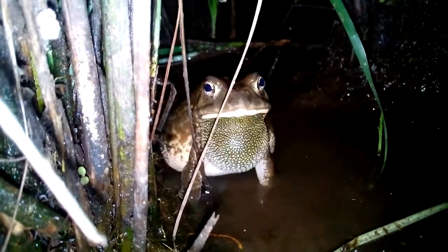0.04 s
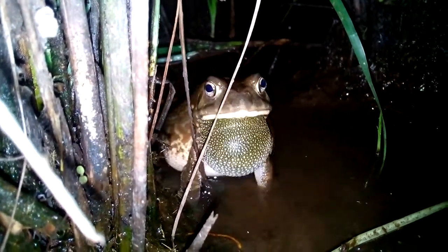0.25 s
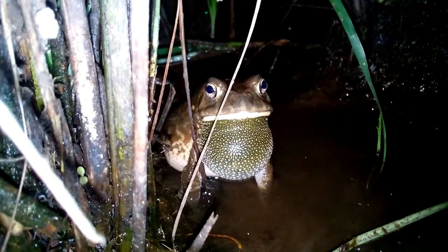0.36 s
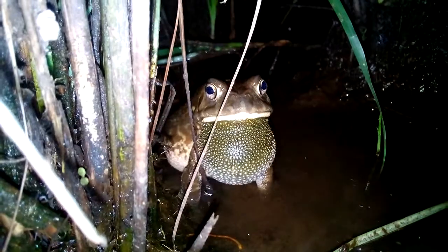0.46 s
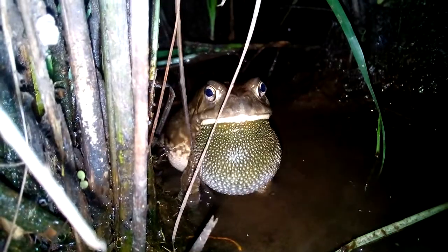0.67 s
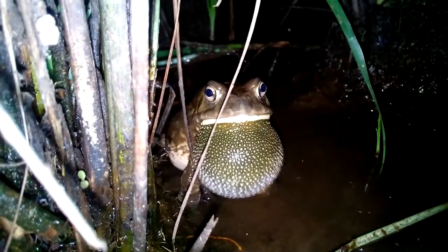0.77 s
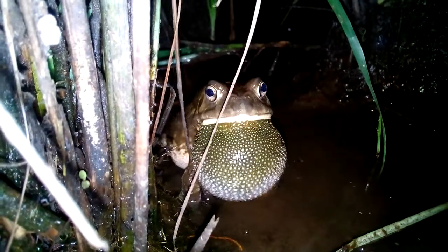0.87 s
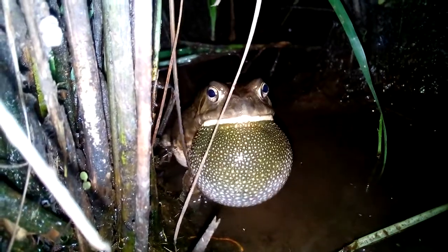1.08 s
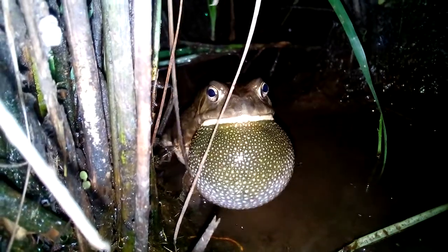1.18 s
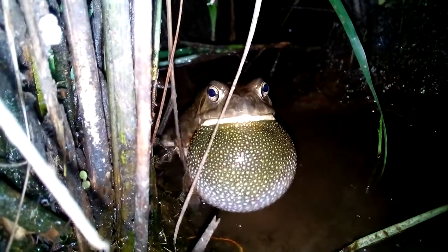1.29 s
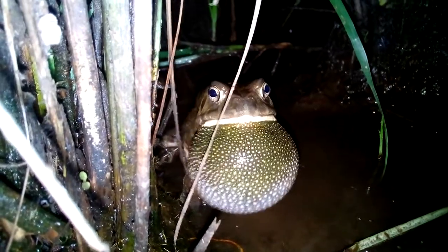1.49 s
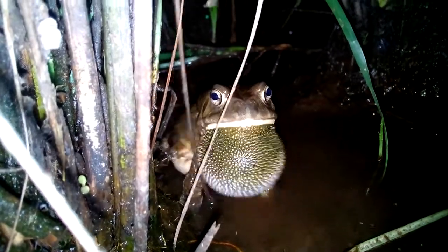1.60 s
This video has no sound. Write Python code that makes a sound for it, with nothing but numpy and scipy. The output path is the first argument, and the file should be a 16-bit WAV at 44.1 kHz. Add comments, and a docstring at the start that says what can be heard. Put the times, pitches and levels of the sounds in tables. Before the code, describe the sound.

Close frog croaking in quickening hollow pulses over a night chorus of chirps and trills.

```python
"""Night at shallow water: a far chorus blurs into a wash and a toad trills without pause.
A small frog starts chirping eight times a second, echoing off the reeds; a far frog whoops twice.
From 0.26 s, between the whoops, a near frog gives one accelerating trill of hollow knocks: puffs of
air ring its filling sac and throat. A few knocks carry a tick; the water rumbles softly beneath.
The main ring rises in pitch, then fades and leaves a dull clack."""
import sys
import numpy as np
from scipy import signal
from scipy.fft import rfft, irfft
from scipy.io import wavfile
from scipy.ndimage import uniform_filter1d, minimum_filter1d

SR = 44100
rng = np.random.default_rng(int(sys.argv[2]) if len(sys.argv) > 2 else 0)


def dump_mix(stems):
    """Bounce the given channels to the path in sys.argv[1] as a 16-bit WAV at rate SR."""
    frames = np.atleast_2d(stems).T  # one column per channel
    limited = np.clip(frames, -1, 1)  # hard clip at full scale
    pcm = np.round(limited * 32767).astype(np.int16)
    wavfile.write(sys.argv[1], SR, pcm)


N = 72765


def from_db(db):
    """Decibels to gain."""
    return 10 ** (np.asarray(db) / 20)


def at_time(rows, time_s):
    """Columns of a curve, interpolated at time_s."""
    times, *columns = np.transpose(rows)
    return [np.interp(time_s, times, column) for column in columns]


def add_ring(out, onset_s, hz, db, attack_s, t60_s):
    """Add one resonance: quick swell around onset_s, exponential decay."""
    span = np.arange(max(0, int((onset_s - .01) * SR)), min(N, int((onset_s + .08) * SR)))
    t = span / SR - onset_s
    swell = .5 + .5 * np.tanh(t / attack_s / 2)
    decay_db = 60 * np.logaddexp(0, t / attack_s) * attack_s / t60_s
    out[span] += from_db(db - decay_db) * swell * np.cos(2 * np.pi * hz * t)


# Chorus and air spectrum: freq_hz, relative_db
NIGHT_SPECTRUM = [(30, -35.5), (200, -41), (300, -29), (430, -3), (600, -9.5), (900, -7), (1400, -2.5),
                  (1800, -5.5), (2300, -19), (3400, -24.5), (4300, -36), (5200, -34), (6200, -42),
                  (7500, -54), (16000, -58)]
# Wash drift: time_s, relative_db
NIGHT_DRIFT = [(0, 0.5), (.3, 0.5), (.9, -1), (1.25, 0.5), (1.34, -4), (1.46, -2.5), (1.65, 2)]


def night(level_db=-42.5):
    """Far chorus and night air, blurred into a noise wash."""
    hz, db = np.transpose(NIGHT_SPECTRUM)
    bin_hz = np.arange(N // 2 + 1) * SR / N
    colour = from_db(np.interp(np.log(bin_hz + 1), np.log(hz), db))
    wash = irfft(rfft(rng.standard_normal(N)) * colour, N)
    drift_db, = at_time(NIGHT_DRIFT, np.arange(N) / SR)
    return from_db(level_db + drift_db) * wash / wash.std()


# Trill envelope: time_s, level_db
TOAD_ENVELOPE = [(0, -37), (.2, -28), (.5, -35), (.8, -29), (1.0, -31), (1.2, -28.5), (1.33, -41),
                 (1.45, -35.5), (1.65, -31)]
# Toad resonances: pitch_hz, gain_db, attack_s, t60_s
TOAD_RESONANCES = [(1294, -3.5, 0.0002, 0.013), (1520, 4.5, .0006, 0.0083), (1780, -5.5, 0.00076, 0.0046)]


def toad(start_rate_hz=137.4, slowing_hz_per_s=1.8, jitter_s=.00013, uneven_db=1.2):
    """Far toad: a fast, slightly slowing train of uneven pulses rings fixed resonances."""
    out = np.zeros(N)
    rate_hz = start_rate_hz - slowing_hz_per_s * np.arange(N) / SR
    cycles = np.cumsum(rate_hz) / SR + .5
    starts_s = np.flatnonzero(np.diff(np.floor(cycles))) / SR
    for start_s in starts_s:
        late_s = rng.normal(0, jitter_s)
        pulse_db = at_time(TOAD_ENVELOPE, start_s)[0] + rng.normal(0, uneven_db)
        for hz, mode_db, attack_s, t60_s in TOAD_RESONANCES:
            add_ring(out, start_s + late_s, hz, pulse_db + mode_db, attack_s, t60_s)
    return out


# Chirp pulses: start_s, relative_db
CHIRP_PULSES = [(.0895, -25.5), (0.1074, -28.5), (.1145, -33), (0.2062, -28.5), (.228, -27), (0.3226, -27),
                (0.3415, -28), (0.4413, -31), (0.4618, -28.5), (.562, -31.5), (0.581, -30), (.593, -35),
                (0.681, -31), (.703, -37), (0.799, -30.5), (.821, -38), (0.8326, -38), (0.921, -37),
                (0.9389, -34), (0.9518, -40), (1.0424, -32.5), (1.0605, -33.5), (1.0751, -36.5),
                (1.165, -31), (1.1826, -33), (1.1955, -35.5), (1.2885, -32), (1.306, -37), (1.319, -38.5),
                (1.4072, -29), (1.425, -30), (1.441, -33), (1.5268, -29), (1.548, -28), (1.5602, -31.5)]
# Small frog resonances: pitch_hz, gain_db, attack_s, t60_s
CHIRP_RESONANCES = [(3338, 3.5, 0.00083, 0.017), (3725, -6.5, 0.00054, .016)]


def small_frog(gain_db=5.5):
    """Chirps of two or three pulses, each ringing two high resonances."""
    out = np.zeros(N)
    for start_s, pulse_db in CHIRP_PULSES:
        for hz, mode_db, attack_s, t60_s in CHIRP_RESONANCES:
            detune = 1 + rng.normal(0, .004)
            add_ring(out, start_s, hz * detune, pulse_db + mode_db + gain_db, attack_s, t60_s)
    return out


def reed_echo(calls, gain_db=-13.5, t60_s=.14, delay_s=.004):
    """Short, faint scatter off stems and bank."""
    t = np.arange(SR // 3) / SR
    tail = rng.standard_normal(len(t)) * from_db(-60 * t / t60_s) * (t > delay_s)
    return from_db(gain_db) * signal.fftconvolve(calls, tail / np.linalg.norm(tail))[:N]


# Whoops: start_s, length_s, from_hz, to_hz, level_db
WHOOP_SWEEPS = [(0.173, 0.084, 850, 1703, -27.5), (0.56, .075, 1094, 1950, -30)]


def far_frog(bend_power=2.1, swell_power=3):
    """Whoops: pure notes that swell as they sweep up ever faster."""
    out = np.zeros(N)
    for start_s, length_s, from_hz, to_hz, level_db in WHOOP_SWEEPS:
        progress = np.clip((np.arange(N) / SR - start_s) / length_s, 0, 1)
        hz = from_hz + (to_hz - from_hz) * progress ** bend_power
        swell = np.sin(np.pi * progress ** swell_power)
        out += from_db(level_db) * swell * np.sin(2 * np.pi * np.cumsum(hz) / SR)
    return out


# Air puffs, one per knock: start_s, main_relative_db, throat_relative_db, low_db
PUFFS = [(0.2629, -9, -4, -26.5), (0.3493, -5.5, -0.5, -28.5), (0.4201, -4.5, -3.5, -31),
         (0.4811, -4.5, -0.5, -31.5), (0.5389, -6, -2, -32), (0.5955, -7, -2, -33),
         (0.6483, -5.5, -0.5, -25), (0.705, -7.5, -2, -22.5), (0.7603, -8.5, -3.5, -29),
         (0.8155, -7.5, -2, -25.5), (.8690, -5, 0.5, -22.5), (0.9187, -7.5, -2, -27.5),
         (0.9629, -7, 2.5, -21), (1.0010, -7.5, 0.5, -18.5), (1.045, -8.5, 1.5, -20), (1.0867, -8, 2, -12),
         (1.1296, -8, 1.5, -21.5), (1.1719, -10.5, 0.5, -20), (1.2138, -10, 2.5, -16.5),
         (1.2507, -11.5, 1.5, -18.5), (1.284, -12.5, 2, -12), (1.3172, -18, -0.5, -14.5),
         (1.3509, -19, -11, -23), (1.3981, -15, -9, -20), (1.4343, -15.5, -7, -20.5)]
# Main sac ring: time_s, pitch_hz, t60_s
SAC_MAIN_RING = [(.26, 1075, 0.023), (.42, 1113, 0.016), (.6, 1181, 0.025), (.76, 1205, .031),
                 (.9, 1214, 0.023), (1.09, 1231, 0.023), (1.25, 1254, 0.025), (1.44, 1283, 0.0096)]
# Low, hollow sac ring: time_s, pitch_hz, t60_s
SAC_LOW_RING = [(.26, 470, 0.033), (1.0, 466, 0.023), (1.2, 491, 0.029), (1.31, 478.6, 0.021),
                (1.35, 458, 0.073), (1.44, 444, 0.048)]
# Sac inflation: time_s, fill_fraction
SAC_FILL = [(.26, 0.068), (.76, 0.26), (.92, 0.49), (1.09, 0.82), (1.3, 1), (1.44, 0.92)]
# Throat resonances: empty_hz, full_hz, empty_db, full_db, attack_s, t60_s
THROAT_RESONANCES = [(640, 836, -18, -17.5, 0.00039, 0.0078), (1510, 1200, -39.5, -14.5, .0007, 0.006),
                     (1836, 1500, -30, -10, 0.00061, 0.0081), (2362, 2365, -20.5, -32.5, 0.00045, 0.0081),
                     (3085, 2824, -18, -26.5, 0.00032, 0.017), (3300, 2980, -23, -15.5, 0.00053, 0.0039),
                     (3670, 3800, -30, -43.5, 0.00043, 0.012), (5160, 4400, -52.5, -57.5, .0003, 0.015),
                     (5500, 6500, -63.5, -49, 0.00032, .005)]
# Thin overtones of the stretching sac: time_s, upper_hz, upper_gain_db, lower_gain_db
SAC_OVERTONES = [(.4, 7000, -69, -73.5), (.76, 6580, -65, -73), (.87, 6280, -55, -64.5),
                 (1.0, 6090, -53, -48.5), (1.13, 5980, -46.5, -49), (1.3, 5770, -39, -48),
                 (1.39, 5770, -32.5, -35), (1.44, 5480, -46, -47.5)]
MAIN_GAIN_DB, THROAT_GAIN_DB = 4, 2
LOW_LEAD_S, THROAT_LEAD_S = .00089, .00031  # ahead of the main ring
BRIGHTENING_PER_OCTAVE = .21  # extra level swing above 1 kHz: weak puffs are duller


def near_frog():
    """Each puff of air rings sac and throat; the tuning shifts as the sac fills."""
    out = np.zeros(N)
    for start_s, main_db, throat_db, low_db in PUFFS:
        hz, t60_s = at_time(SAC_MAIN_RING, start_s)
        add_ring(out, start_s, hz, main_db + MAIN_GAIN_DB, attack_s=.00054, t60_s=t60_s)
        hz, t60_s = at_time(SAC_LOW_RING, start_s)
        add_ring(out, start_s - LOW_LEAD_S, hz, low_db, attack_s=.00088, t60_s=t60_s)

        fill, = at_time(SAC_FILL, start_s)
        for empty_hz, full_hz, empty_db, full_db, attack_s, t60_s in THROAT_RESONANCES:
            detune = 1 + rng.normal(0, .006)
            hz = (empty_hz + fill * (full_hz - empty_hz)) * detune
            force_db = throat_db * (1 + BRIGHTENING_PER_OCTAVE * np.log2(hz / 1000))
            mode_db = empty_db + fill * (full_db - empty_db) + rng.normal(0, 1)
            onset_s = start_s - THROAT_LEAD_S + rng.normal(0, .00005)
            add_ring(out, onset_s, hz, THROAT_GAIN_DB + force_db + mode_db, attack_s, t60_s)

        upper_hz, upper_db, lower_db = at_time(SAC_OVERTONES, start_s)
        add_ring(out, start_s, hz=upper_hz, db=upper_db + throat_db, attack_s=.0005, t60_s=.055)
        add_ring(out, start_s, hz=5420, db=lower_db + throat_db, attack_s=.0005, t60_s=.022)
    return out


# Ticks: start_s, level_db
KNOCK_TICKS = [(0.3475, -45), (0.6487, -42.5), (0.8668, -38), (1.088, -43.5)]
# Tick resonances: pitch_hz, gain_db, t60_s
TICK_RESONANCES = [(8800, -15, .001), (10900, -3.5, .004), (13300, -3, 0.0029), (97.6, 3.5, .008)]


def ticks():
    """Tiny dry clicks at the crest of four knocks."""
    out = np.zeros(N)
    for start_s, level_db in KNOCK_TICKS:
        for hz, mode_db, t60_s in TICK_RESONANCES:
            add_ring(out, start_s, hz, level_db + mode_db, attack_s=.0001, t60_s=t60_s)
    return out


# Rumble envelope: time_s, level_db
RUMBLE_ENVELOPE = [(.25, -85), (.35, -66), (.45, -80.5), (.66, -85), (.70, -53.5), (.76, -69.5), (.87, -66),
                   (.92, -80), (.97, -62.5), (1.1, -58.5), (1.22, -66.5), (1.42, -62), (1.52, -83)]


def water_rumble(cutoff_hz=216):
    """Soft low bumps as the near frog stirs the water."""
    lowpass = signal.butter(4, cutoff_hz, fs=SR, output="sos")
    rumble = signal.sosfilt(lowpass, rng.standard_normal(N))
    level_db, = at_time(RUMBLE_ENVELOPE, np.arange(N) / SR)
    return from_db(level_db) * rumble / rumble.std()


def scene(knock_echo_db=-2.5):
    """Mono mix: all callers, echoes of the nearest two, water and night."""
    knocks, chirps = near_frog(), small_frog()
    echoes = reed_echo(from_db(knock_echo_db) * knocks + chirps)
    return (knocks + ticks() + chirps + echoes + toad() + far_frog() + water_rumble() + night())[None]


def record(dry, ceiling=.49, window_s=.002, cutoff_hz=16000):
    """Fast peak limiter, then a steep low-pass."""
    window = int(window_s * SR)
    needed_gain = np.minimum(1, ceiling / (np.abs(dry) + 1e-9))
    held_gain = minimum_filter1d(needed_gain, 2 * window)
    smooth_gain = uniform_filter1d(uniform_filter1d(held_gain, window), window)
    lowpass = signal.cheby2(12, 70, cutoff_hz, fs=SR, output="sos")
    return signal.sosfilt(lowpass, dry * smooth_gain)


dry = scene()
out = record(dry)
dump_mix(out)
```